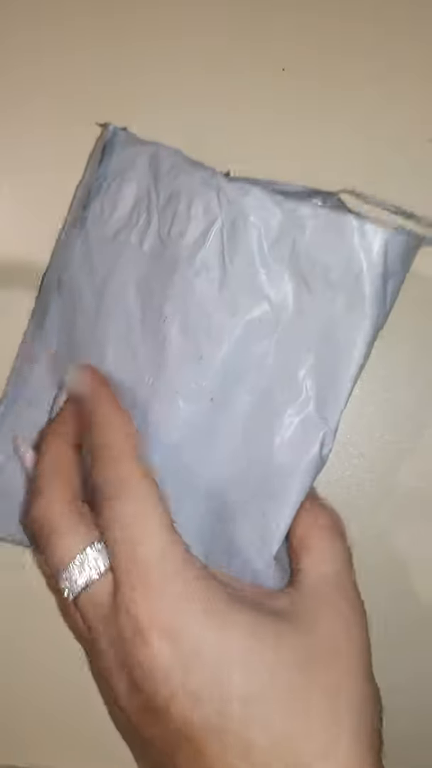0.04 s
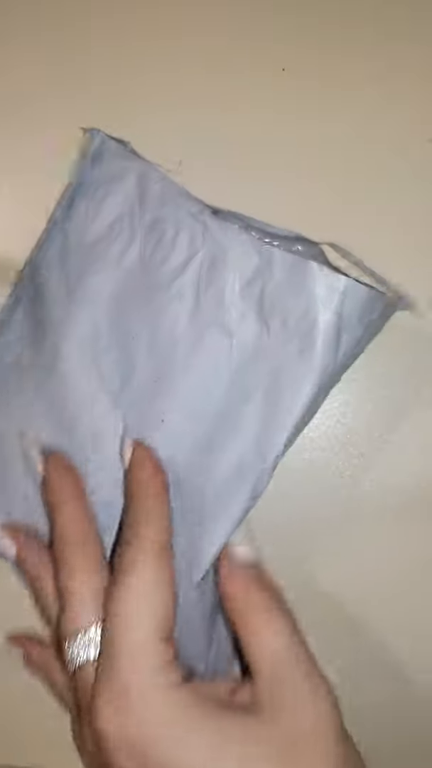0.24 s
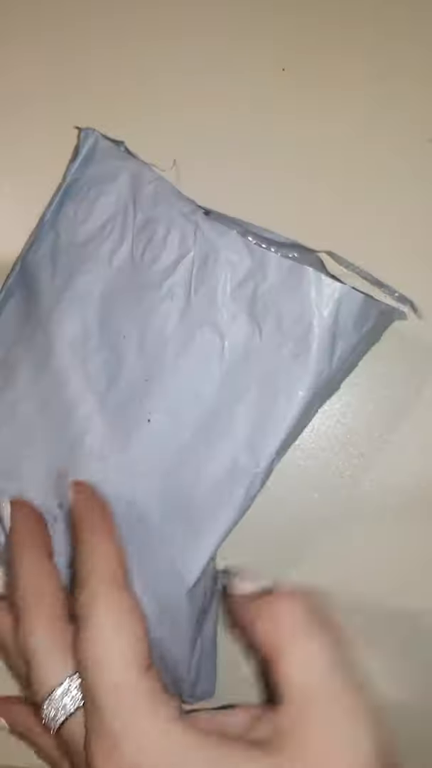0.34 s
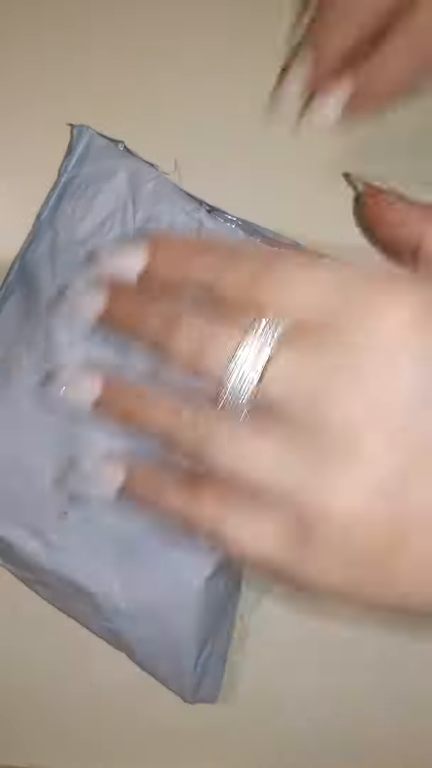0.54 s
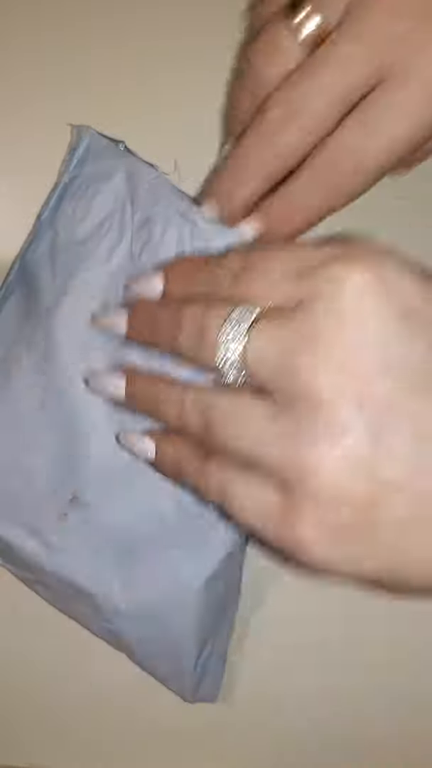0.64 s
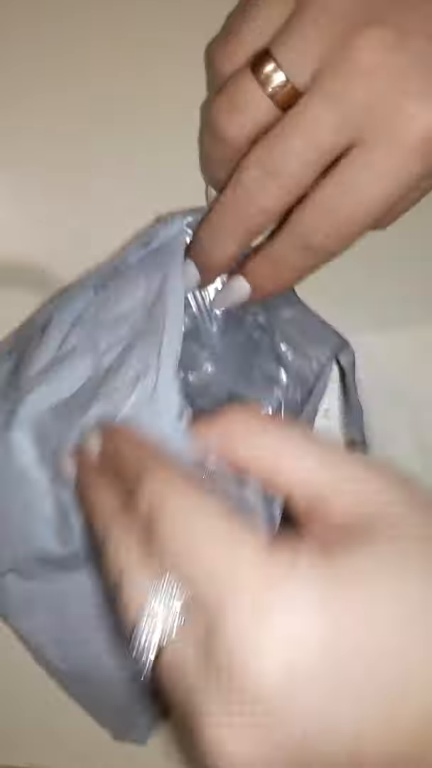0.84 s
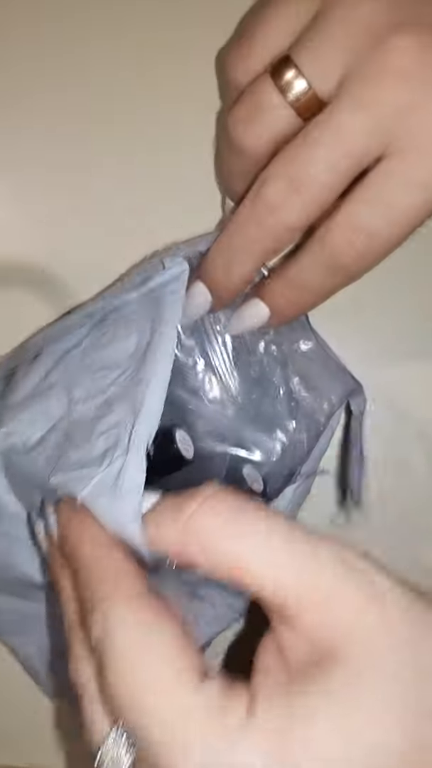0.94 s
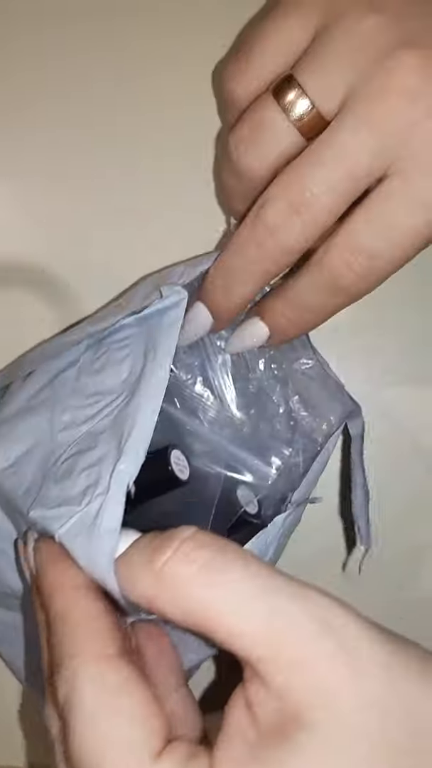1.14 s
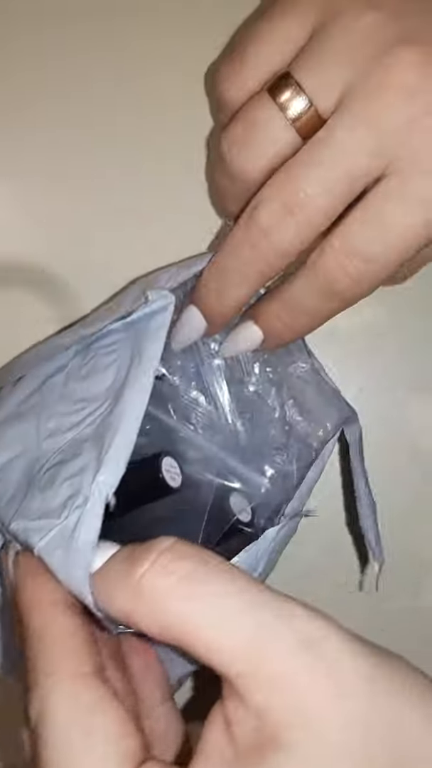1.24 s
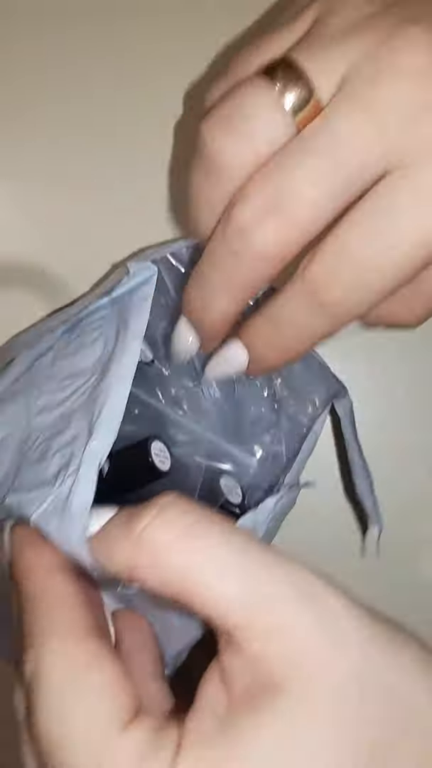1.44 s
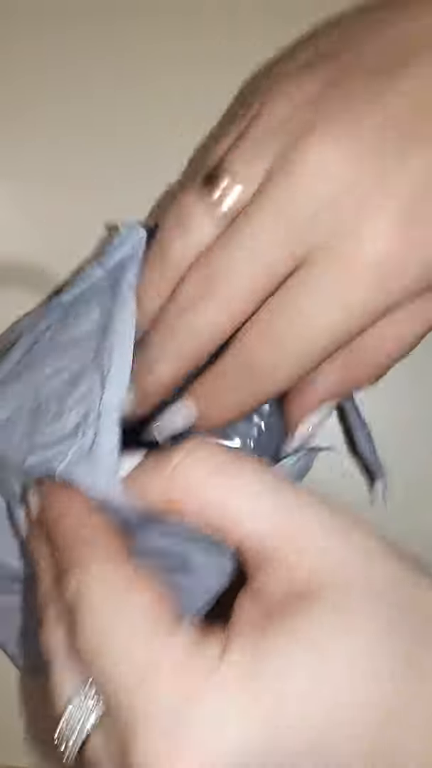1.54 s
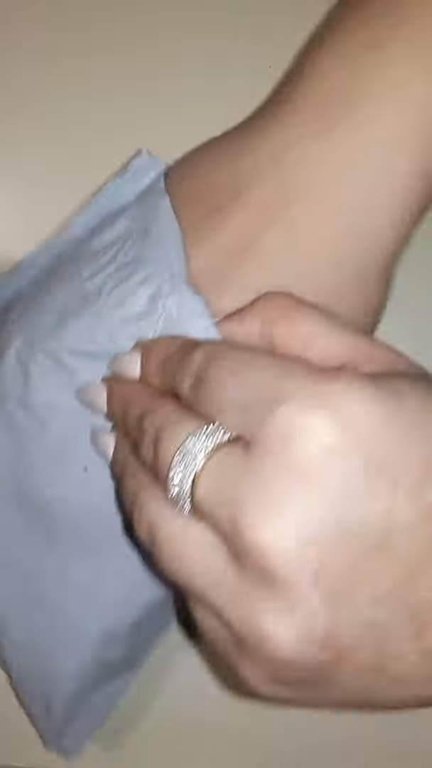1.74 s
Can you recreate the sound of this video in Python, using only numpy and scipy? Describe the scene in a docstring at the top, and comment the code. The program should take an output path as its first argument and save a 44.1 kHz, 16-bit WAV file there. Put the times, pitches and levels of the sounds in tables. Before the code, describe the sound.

Close up in a small, quiet, hard-walled room, thin plastic packaging crinkles, snaps sharply with a brief ring, ticks a little, rustles open, nearly stops, then rustles fuller as a hand reaches inside.

```python
"""Plastic film crackles under a grip, snaps loudly once, rustles as it is pulled open, then as a hand slides in.
It is a mailer bag on a table, close to a phone in a small, hard-walled room.
Each crease that flips is a millisecond click of filtered noise; swarms of tiny ones make the rustle.
The snap is a few dense bursts of creases, with a low thump and decaying tones for bag and table.
Decaying noise makes the room ring after the film; quiet air and a faint hum lie beneath."""
import sys
import numpy as np
from scipy import signal
from scipy.fft import rfft, irfft
from scipy.io import wavfile
from scipy.ndimage import uniform_filter1d

SR = 44100
rng = np.random.default_rng(int(sys.argv[2]) if len(sys.argv) > 2 else 0)


def wav_out(sig):
    """Save sig, one row per channel (or a flat mono array), as 16-bit PCM at SR to the path in sys.argv[1]."""
    wavfile.write(sys.argv[1], SR, np.round(np.clip(np.atleast_2d(sig).T, -1, 1) * 32767).astype(np.int16))


N = 79380  # samples: 1.8 seconds

# The whole wall of the bag buckling in quick jerks.
# Each row: start in seconds, level in dB before rise and decay, decay time in seconds.
SNAPS = [(.2112, -11, 0.005), (0.213, -8, .003), (0.2217, -12.5, 0.004), (0.2406, -18, 0.0027),
         (0.2416, -16, 0.0053), (0.261, -25.5, 0.0064), (.33, -35, .003)]
# Colour of the snap. Each row: frequency in Hz, relative level in dB per Hz.
SNAP_COLOUR = [(100, -22), (250, -4.5), (500, -1), (800, -5.5), (1060, 5), (1350, -1), (1750, -2.5),
               (2250, 4), (3300, -0.5), (4400, -2), (6300, -5.5), (7700, -21.5), (10300, -16.5),
               (12000, -24.5), (14500, -20.5), (16000, -27.5)]
SNAP_RISE_S, SNAP_RIPPLE_HZ = 0.0004, 198  # the spectrum is even over spans wider than the ripple
SNAP_GRAINS_PER_S, SNAP_SPREAD_DB = 4500, 1.5
# Crinkling as the wall settles after the snap. Each row: time in seconds, level in dB.
SETTLE = [(.225, -33.5), (.25, -28), (.29, -38.5), (.335, -46.5), (.37, -61.5)]

# What rings after the buckling, bag and table.
# Each row: frequency in Hz, level in dB before MODES_DB is added, time to fall 60 dB in seconds.
MODES = [(133, -15, .58), (248, -15, .24), (511, -12, .22), (545, -14, .18), (916, -13, .18),
         (1063, 0, .18), (1168, -9, .18), (1353, -13, .2), (2293, -9, .18), (2366, -10, .2),
         (2532, -10, .26), (2862, -12, .25), (3217, -11, .2)]
MODES_DB, MODE_RISE_S = -19, 0.012
# Colour of the low thump. Each row: frequency in Hz, relative level in dB per Hz.
THUMP_COLOUR = [(30, -32.5), (70, -15), (130, 0.5), (300, 1.5), (600, -3.5), (1000, -10.5), (3000, -50)]
THUMP_DB, THUMP_RISE_S, THUMP_T60_S = -21.5, 0.048, 0.33

# Single creases flipping, with levels before the three strengths below are added.
# Each row: start in seconds, body level in dB, crack level in dB, crack centre in Hz, fizz level in dB.
CREASES = [(0.0252, -35, -35, 2400, -56), (0.0422, -37, -32, 4800, -52), (0.0468, -43, -33, 3050, -51),
           (0.051, -29, -23, 2700, -36), (0.109, -42, -36, 4250, -50), (0.1154, -39, -33, 6150, -43),
           (0.1256, -39, -32, 4100, -42), (0.146, -47, -31, 4750, -47), (0.1555, -35, -37, 2200, -51),
           (0.163, -37, -34, 2200, -45), (0.167, -41, -27, 6150, -35), (0.1713, -33, -29, 3450, -44),
           (0.197, -35, -35, 4200, -44), (0.2008, -27, -18, 3650, -46), (0.211, -23, -16, 2300, -26),
           (0.2402, -26, -20, 2500, -28), (0.41, -54, -48, 5450, -53), (0.4283, -37, -32, 3000, -42),
           (0.4348, -42, -34, 2950, -47), (0.4621, -40, -30, 2900, -42), (0.4976, -35, -27, 6850, -40),
           (0.6814, -55, -53, 3800, -66), (0.7113, -52, -48, 4950, -53), (0.7349, -51, -42, 4800, -45),
           (0.745, -49, -41, 5700, -50), (0.7597, -45, -43, 4300, -52), (0.79, -54, -42, 6050, -45),
           (0.7992, -46, -38, 5450, -47), (0.8286, -44, -34, 4150, -48), (0.8671, -48, -38, 5100, -50),
           (0.8977, -41, -31, 4000, -37), (0.9298, -51, -42, 6200, -52), (0.9564, -52, -39, 5150, -54),
           (0.9601, -48, -39, 5300, -46), (0.9662, -43, -30, 6650, -41), (0.9802, -45, -39, 5150, -47),
           (0.9957, -50, -39, 6050, -49), (1.002, -49, -37, 6000, -47), (1.061, -38, -34, 2200, -42),
           (1.2483, -71, -62, 4700, -77), (1.3439, -61, -54, 5000, -68), (1.3654, -59, -60, 4750, -74),
           (1.3956, -53, -50, 4300, -59), (1.415, -59, -53, 3750, -63), (1.4337, -66, -54, 5750, -64),
           (1.4907, -60, -58, 6250, -73), (1.5334, -60, -68, 2200, -80), (1.5446, -56, -53, 6400, -63),
           (1.5525, -53, -54, 2200, -59), (1.5922, -45, -35, 6450, -41), (1.6318, -46, -33, 6050, -38),
           (1.6394, -46, -34, 3550, -39), (1.649, -46, -34, 6350, -40), (1.655, -41, -37, 5650, -39),
           (1.6725, -38, -35, 3650, -39), (1.7132, -34, -32, 2200, -41), (1.7172, -26, -32, 2200, -39),
           (1.7572, -36, -29, 3150, -38), (1.7755, -37, -34, 2200, -42)]
CREASE_BODY_DB, CREASE_CRACK_DB, CREASE_FIZZ_DB = -1.5, -1, 1.8  # strength of all creases
CREASE_RISE_S, CREASE_DECAY_S, CLICK_RIPPLE_HZ = 0.0005, 0.00062, 1502
BODY_HZ, BODY_WIDTH_HZ = 1347, 820  # resonance of the film
CRACK_HZ, FIZZ_HZ = 2140, 6890  # lower edges of crack and fizz
CRACK_WIDTH_HZ, CRACK_RESONANCE = 1300, 0.95  # width and height of the peak in each crack

# Dull knocks of the fingers and the contents through the bag.
# Each row: start in seconds, level in dB before doubling and damping, frequency in Hz.
KNOCKS = [(0.2024, -31.5, 350), (0.2798, -29.5, 480), (0.7976, -49, 493), (0.898, -49.5, 467),
          (1.0606, -48.5, 458), (1.7575, -50, 500)]
KNOCK_DECAY_S = 0.0025

# Level of the rustle as the hand grips the film. Each row: time in seconds, level in dB.
GRIP = [(0, -44.5), (.04, -45.5), (.08, -48), (.105, -45.5), (.125, -40.5), (.15, -46.5), (.17, -36.5),
        (.195, -44.5), (.22, -72.5)]
# Rustle as the mouth is pulled open. Each row: time in seconds, level in dB.
OPEN = [(.67, -70), (.705, -52), (.74, -49.5), (.81, -44), (.87, -45.5), (.91, -43), (.945, -52),
        (.99, -49.5), (1.02, -67), (1.055, -60), (1.09, -67)]
# Faint rustle while the bag is held. Each row: time in seconds, level in dB.
HOLD = [(1.1, -81), (1.25, -75.5), (1.32, -80), (1.35, -65.5), (1.395, -56), (1.44, -69), (1.47, -65.5),
        (1.54, -74)]
# Rustle as the hand slides in. Each row: time in seconds, level in dB.
REACH = [(1.54, -67), (1.56, -44), (1.585, -41), (1.615, -39), (1.635, -36.5), (1.69, -39), (1.73, -36),
         (1.77, -36), (1.8, -43.5)]
# Hollow rub of the hand inside the bag. Each row: time in seconds, level in dB.
RUB = [(1.55, -60.5), (1.6, -49), (1.66, -51.5), (1.7, -38.5), (1.725, -36), (1.775, -44.5), (1.8, -46)]
# Colour of each of these five sounds. Each row: frequency in Hz, relative level in dB per Hz.
GRIP_COLOUR = [(50, -27), (150, -7), (280, 0), (700, -9), (1200, 0), (1800, -3), (4200, -7), (6500, -9),
               (7800, -14.5), (15500, -16)]
OPEN_COLOUR = [(50, -18), (200, -4), (500, -0.5), (1300, 1.5), (4000, 1), (6800, 0), (7800, -6),
               (15500, -7)]
HOLD_COLOUR = [(100, -9), (700, -10), (1450, 3), (2800, -8.5), (4800, -0.5), (6600, -7), (7800, -11),
               (15500, -18)]
REACH_COLOUR = [(50, -25.5), (200, -5.5), (600, -1), (1600, -6), (2700, -6.5), (3700, 0), (6700, -1),
                (7700, -6), (15500, -7)]
RUB_COLOUR = [(50, -22), (250, -10), (600, -9), (950, 0.5), (1900, 3.5), (2800, -3.5), (8000, -19)]
GRAINS_PER_S, HOLD_GRAINS_PER_S, SLIDE_GRAINS_PER_S = 1500, 1100, 3200
GRAIN_SPREAD_DB, SLIDE_SPREAD_DB, GRAIN_DECAY_S = 1.5, 1, 0.0005

# Times for the room's sound to fall 60 dB, and the wait before it starts.
ROOM_T60_S, ROOM_TREBLE_T60_S, EARLY_T60_S, ROOM_DELAY_S = 0.27, 0.13, 0.031, 0.0022
EARLY_DB, ROOM_RIPPLE_HZ = 0, 122.1  # early reflections against the tail
CREASE_ROOM_DB, SNAP_ROOM_DB, RUSTLE_ROOM_DB = -7.5, -1.5, -10.5  # how much of each enters the room

# Colour of the quiet air. Each row: frequency in Hz, relative level in dB per Hz.
FLOOR_COLOUR = [(25, -25.5), (60, -3.5), (100, -4.5), (280, 0), (450, -12.5), (1000, -19), (3000, -25.5),
                (6500, -21), (8000, -28.5), (15500, -27.5)]
FLOOR_DB = -68
# Steady tones of the hum. Each row: frequency in Hz, average (rms) level in dB.
HUM = [(96.9, -76.5), (145.3, -80.5), (220.7, -75.5)]

LIKENESS = 0.42  # share of the film's noise power common to left and right
PORT_LAG_S = 0.00005  # lag of the right microphone port, rounded down to whole samples
PAN_DB, FIZZ_PAN_DB = 2.1, 0  # left louder than right in the crack range; the highest fizz is balanced
LOW_CUT_HZ, TOP_HZ = 45, 15800
PRESENCE_HZ, PRESENCE_Q, PRESENCE_DB = 6455, 9.8, -14  # dB of the resonance that is added to the sound


def buckle():
    """Many creases give way at once: a few dense bursts, each dying within milliseconds."""
    t = np.arange(N) / SR
    power = 0
    for start, db, decay_s in SNAPS:
        age = np.maximum(t - start, 0)
        envelope = amp(db) * (1 - np.exp(-age / SNAP_RISE_S)) * np.exp(-age / decay_s)
        power = power + envelope ** 2
    swarm = grains(SNAP_GRAINS_PER_S, SNAP_SPREAD_DB)
    bursts = even(swarm * np.sqrt(power), SNAP_RIPPLE_HZ)
    return colour(bursts, SNAP_COLOUR) * (power > 1e-9)  # silent outside the bursts


def boom():
    """The buckling wall pushes air: a low thump swells and dies, and bag and table ring on."""
    t = np.maximum(np.arange(N) / SR - SNAPS[0][0], 0)
    ring = 0
    for hz, db, t60 in MODES:
        # the higher the tone, the more its start may differ between left and right
        phase = min(hz / 3000, 1) * rng.random((2, 1))
        ring = ring + amp(db) * np.sin(2 * np.pi * (hz * t + phase)) * fade(t, t60)
    ring = amp(MODES_DB) * ring * (1 - np.exp(-t / MODE_RISE_S))
    noise = pair(rng.standard_normal((3, N)), 0.93)
    thump = colour(noise, THUMP_COLOUR) * fade(t, THUMP_T60_S)
    thump = amp(THUMP_DB) * thump * (1 - np.exp(-t / THUMP_RISE_S))
    return ring + thump


def clicks():
    """Each flip of the film is a short noise burst, split into body, ringing crack and fizz."""
    t = np.arange(2048) / SR
    out = np.zeros((2, N + len(t)))
    shape = (1 - np.exp(-t / CREASE_RISE_S)) ** 2 * np.exp(-t / CREASE_DECAY_S)
    for start, body_db, crack_db, crack_hz, fizz_db in CREASES:
        noise = pair(rng.standard_normal((3, len(t))), LIKENESS)
        burst = even(noise * shape, CLICK_RIPPLE_HZ) * (t < 10 * CREASE_DECAY_S)
        body = cut(cut(burst, CRACK_HZ, "low"), BODY_HZ / 2, "high")
        body = peak(body, BODY_HZ, BODY_WIDTH_HZ)
        crack = burst + CRACK_RESONANCE * peak(burst, crack_hz, CRACK_WIDTH_HZ)
        crack = cut(cut(crack, CRACK_HZ, "high"), FIZZ_HZ, "low", order=12)
        fizz = cut(cut(burst, FIZZ_HZ, "high", order=4), TOP_HZ, "low", order=4)
        click = amp(body_db + CREASE_BODY_DB) * unit(body)
        click += amp(crack_db + CREASE_CRACK_DB) * unit(crack)
        click += amp(fizz_db + CREASE_FIZZ_DB) * unit(fizz)
        i = int(start * SR)
        out[:, i:i + len(t)] += 10 * click  # levels are averages over 100 samples
    return out[:, :N]


def knocks():
    """Each knock is a heavily damped low swing of the bag."""
    out = 0
    for start, db, hz in KNOCKS:
        t = np.maximum(np.arange(N) / SR - start, 0)
        out = out + 2 * amp(db) * np.sin(2 * np.pi * hz * t) * np.exp(-t / KNOCK_DECAY_S)
    return out


def rustle(curve, points, per_s, spread_db):
    """A coloured swarm of tiny creases swells and sinks with the move of the hand."""
    t = np.arange(N) / SR
    s, db = np.array(curve).T
    outside = np.maximum(s[0] - t, t - s[-1])
    edges = np.clip(1 - outside / 0.004, 0, 1)  # fade over 4 ms before and after the move
    return colour(grains(per_s, spread_db), points) * amp(np.interp(t, s, db)) * edges


def grains(per_s, spread_db):
    """Tiny creases flip at random moments, mostly weak and a few stronger, with mean power 1."""
    size = amp(spread_db * np.minimum(rng.exponential(size=N), 3))
    size = size * (rng.random(N) < per_s / SR)
    # every flip adds power that dies away exponentially
    power = signal.lfilter([1], [1, -np.exp(-2 / (GRAIN_DECAY_S * SR))], size ** 2)
    return pair(rng.standard_normal((3, N)), LIKENESS) * np.sqrt(power / power.mean())


def room(x):
    """Quick reflections from the table, and the diffuse tail of the walls, whose treble dies sooner."""
    t = np.arange(SR // 2) / SR
    late, early = rng.standard_normal((2, 2, len(t))) * (t > ROOM_DELAY_S)
    tail = cut(late, FIZZ_HZ, "low") * fade(t, ROOM_T60_S)
    tail = tail - cut(late, FIZZ_HZ, "high") * fade(t, ROOM_TREBLE_T60_S)
    reflections = amp(EARLY_DB) * unit(early * fade(t, EARLY_T60_S))
    echoes = even(unit(tail) + reflections, ROOM_RIPPLE_HZ)
    return signal.fftconvolve(x, echoes * (t < 0.4), axes=1)[:, :N]


def background():
    """Quiet room air, made of coloured noise, with a faint hum of steady tones."""
    t = np.arange(N) / SR
    hum = 0
    for hz, db in HUM:
        hum = hum + amp(db) * np.sqrt(2) * np.sin(2 * np.pi * (hz * t + rng.random()))
    air = colour(pair(rng.standard_normal((3, N)), 0.53), FLOOR_COLOUR)
    return hum + amp(FLOOR_DB) * air


def amp(db):
    """Decibels to gain."""
    return 10 ** (np.asarray(db) / 20)


def fade(t, t60):
    """Decay by 60 dB in t60 seconds."""
    return np.exp(-np.log(1000) * t / t60)


def unit(x):
    """Scale each channel to energy 1."""
    return x / np.sqrt(np.sum(x ** 2, axis=-1, keepdims=True) + 1e-30)


def cut(x, hz, kind, order=2):
    """Butterworth low-pass or high-pass."""
    return signal.sosfilt(signal.butter(order, min(hz, SR / 2 - 1), kind, fs=SR, output="sos"), x)


def peak(x, hz, width_hz):
    """A resonance with gain 1 at its centre."""
    return signal.lfilter(*signal.iirpeak(hz, hz / width_hz, fs=SR), x)


def colour(x, points):
    """Shape by (Hz, dB) points, keeping the power of white noise."""
    hz, db = np.array(points).T
    gain = amp(np.interp(np.log(np.fft.rfftfreq(N, 1 / SR) + 1), np.log(hz), db))
    return irfft(rfft(x) * gain / np.sqrt(np.mean(gain ** 2)), N)


def even(x, span_hz):
    """Level out the broad ripples of a random burst's spectrum, keeping its energy averaged over channels."""
    size = x.shape[-1]
    spectrum = rfft(x)
    span = max(int(span_hz * size / SR), 1)
    power = uniform_filter1d(np.abs(spectrum) ** 2, span, axis=-1)
    levelled = irfft(spectrum / np.sqrt(np.abs(power) + 1e-20), size)
    return unit(levelled) * np.sqrt(np.sum(x ** 2) / len(x))


def pair(noise, likeness):
    """Left and right from three noises, the first shared."""
    c = np.clip(likeness, 0, 1)
    return np.sqrt(c) * noise[0] + np.sqrt(1 - c) * noise[1:]


def scene():
    """Creases, snap and rustle in the room, their crack range slightly left, with boom and background."""
    snap = buckle() + rustle(SETTLE, SNAP_COLOUR, HOLD_GRAINS_PER_S, GRAIN_SPREAD_DB)
    creases = clicks() + knocks()
    film = rustle(GRIP, GRIP_COLOUR, GRAINS_PER_S, GRAIN_SPREAD_DB)
    film += rustle(OPEN, OPEN_COLOUR, GRAINS_PER_S, GRAIN_SPREAD_DB)
    film += rustle(HOLD, HOLD_COLOUR, HOLD_GRAINS_PER_S, GRAIN_SPREAD_DB)
    film += rustle(REACH, REACH_COLOUR, SLIDE_GRAINS_PER_S, SLIDE_SPREAD_DB)
    film += rustle(RUB, RUB_COLOUR, SLIDE_GRAINS_PER_S, SLIDE_SPREAD_DB)
    left, right = creases + snap + film
    direct = np.array([left, np.roll(right, int(PORT_LAG_S * SR))])
    to_room = amp(CREASE_ROOM_DB) * creases + amp(SNAP_ROOM_DB) * snap + amp(RUSTLE_ROOM_DB) * film
    heard = direct + room(to_room)
    # no lean in the bass and the highest fizz, a slight lean to the left between
    freqs = np.fft.rfftfreq(N, 1 / SR)
    pan_db = np.interp(freqs, [500, 1500, 5500, 8500], [0, PAN_DB, PAN_DB, FIZZ_PAN_DB])
    panned = irfft(rfft(heard) * amp(np.array([pan_db, -pan_db]) / 2), N)
    return panned + boom() + background()


def record(dry):
    """The phone thins the deep bass, has a presence peak, clips at full scale and cuts the top."""
    presence = amp(PRESENCE_DB) * peak(dry, PRESENCE_HZ, PRESENCE_HZ / PRESENCE_Q)
    x = cut(dry, LOW_CUT_HZ, "high") + presence
    top_cut = signal.ellip(8, 0.2, 70, TOP_HZ, fs=SR, output="sos")
    return signal.sosfilt(top_cut, np.clip(x, -1, 1))


dry = scene()
out = record(dry)
wav_out(out)
```